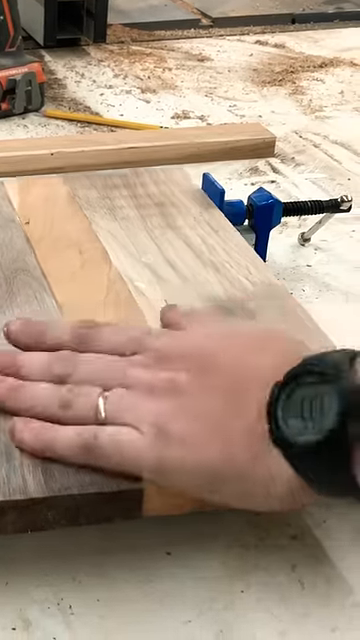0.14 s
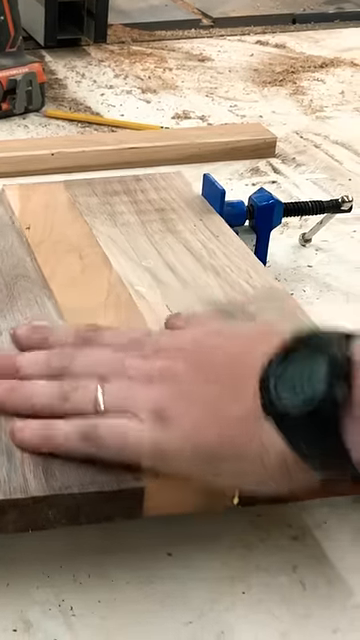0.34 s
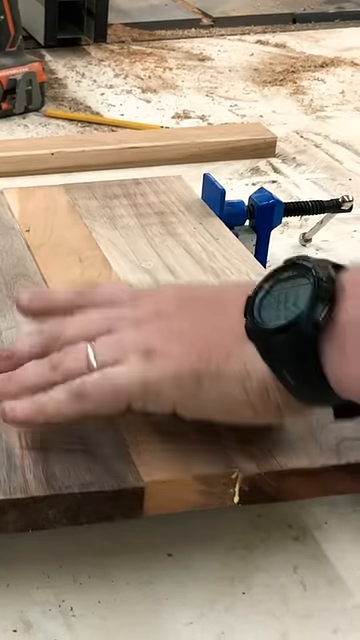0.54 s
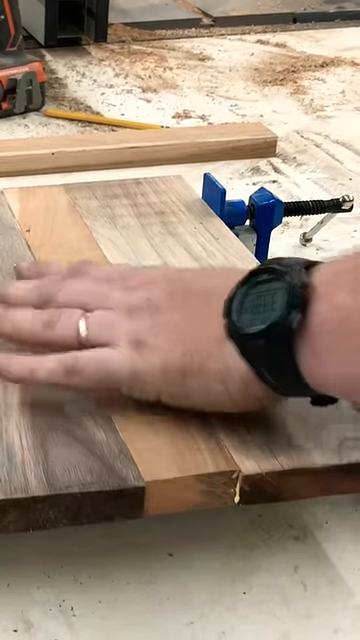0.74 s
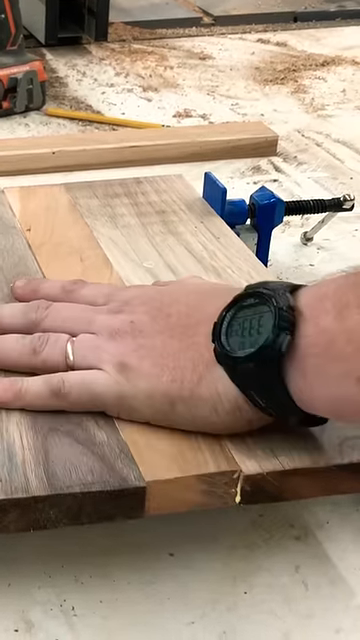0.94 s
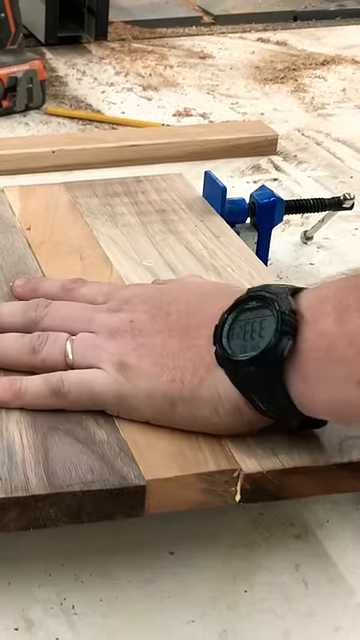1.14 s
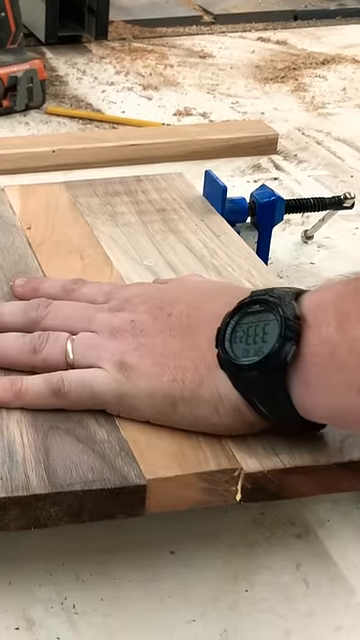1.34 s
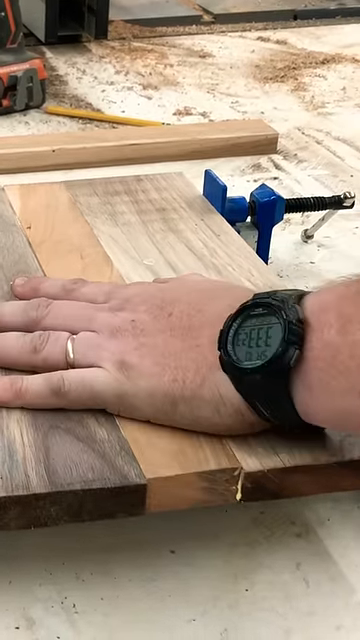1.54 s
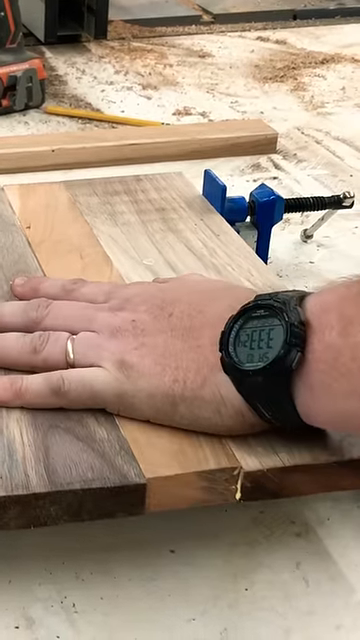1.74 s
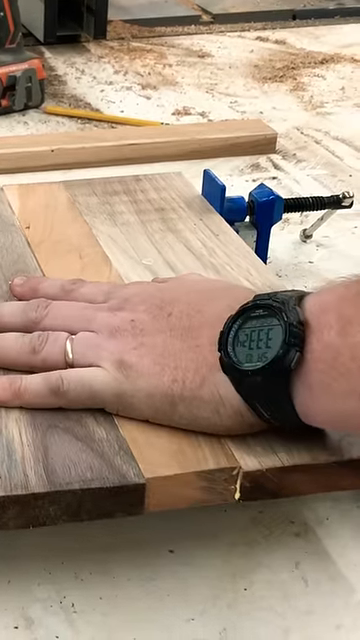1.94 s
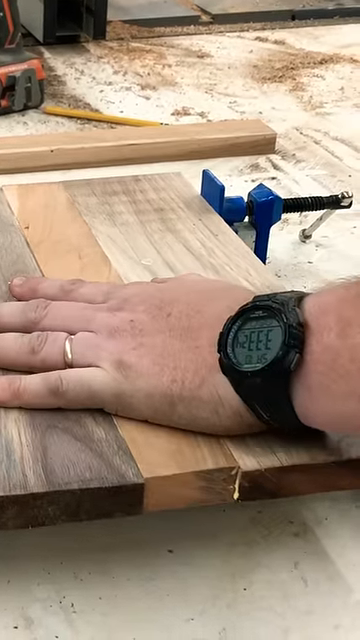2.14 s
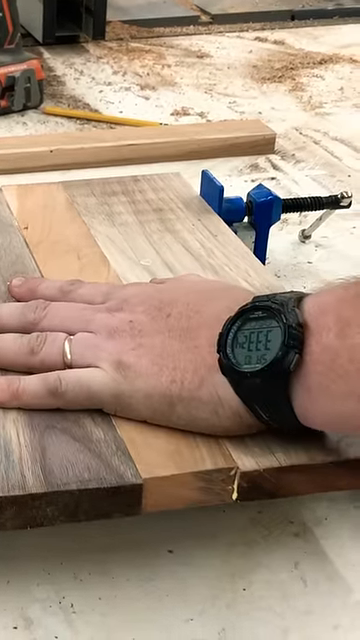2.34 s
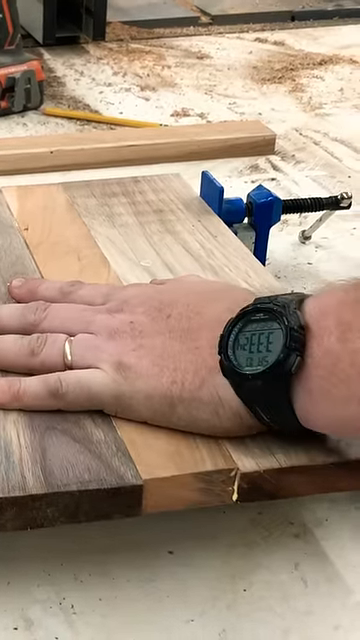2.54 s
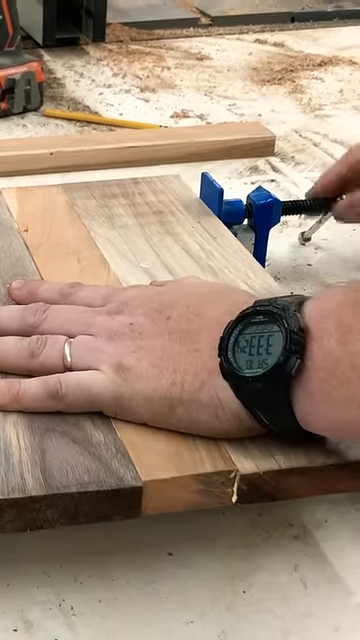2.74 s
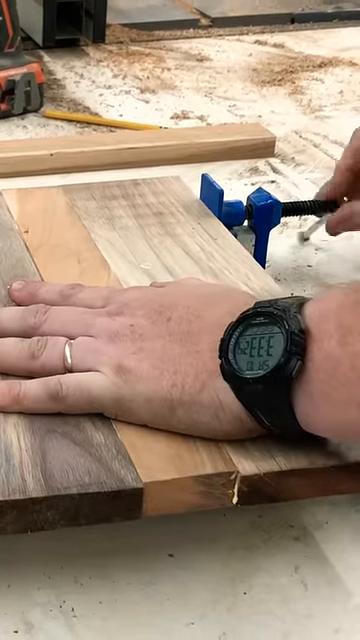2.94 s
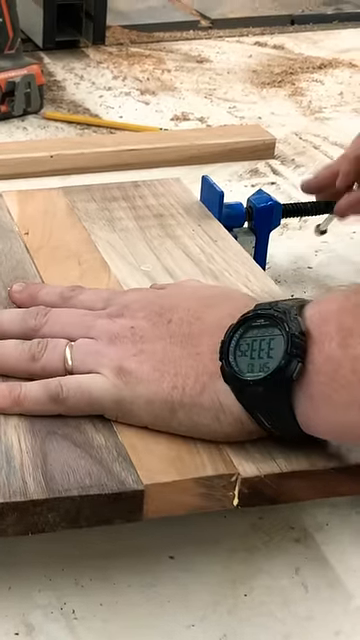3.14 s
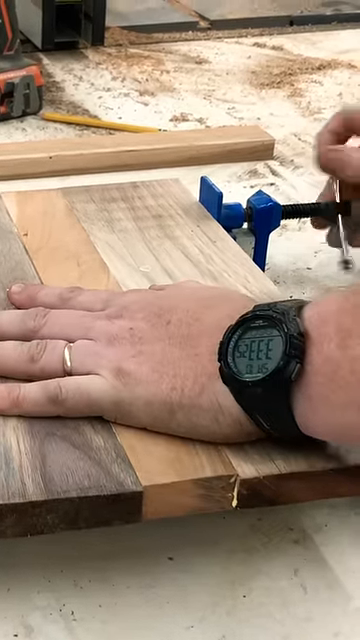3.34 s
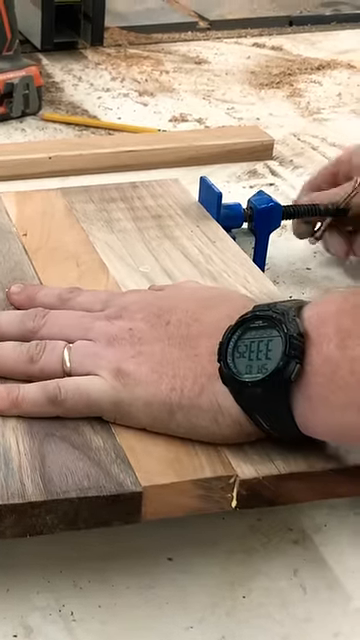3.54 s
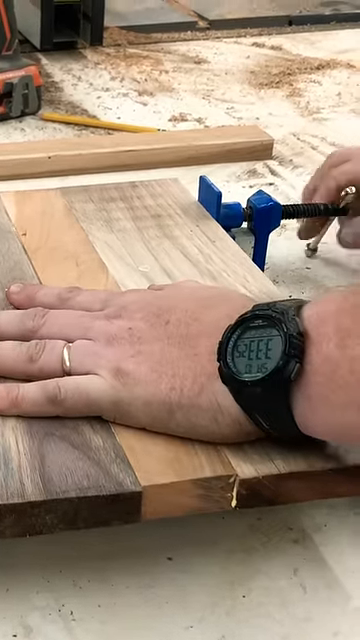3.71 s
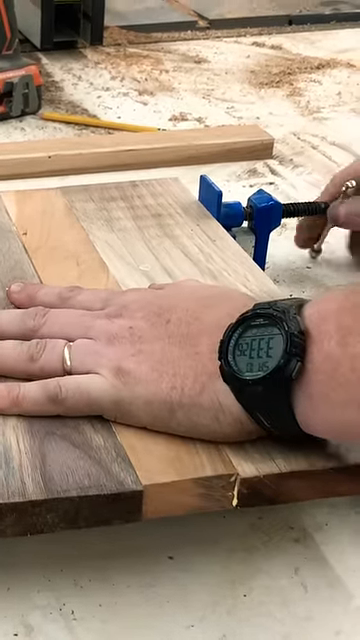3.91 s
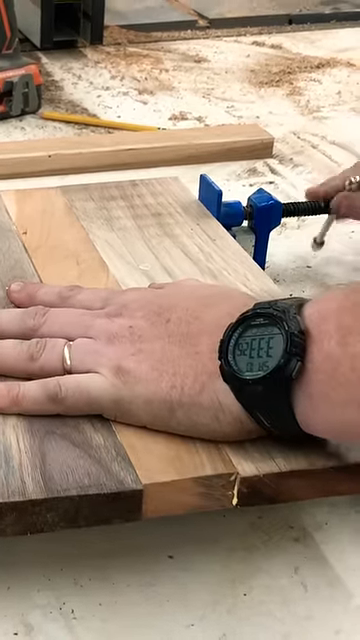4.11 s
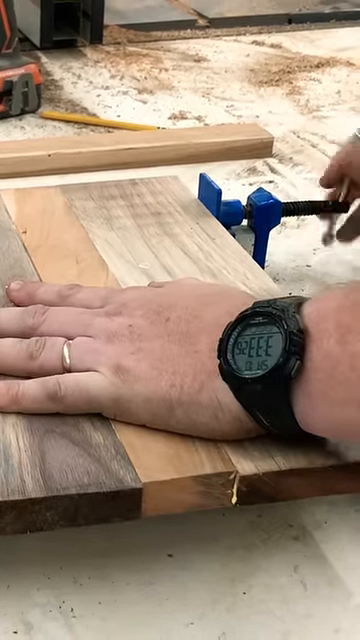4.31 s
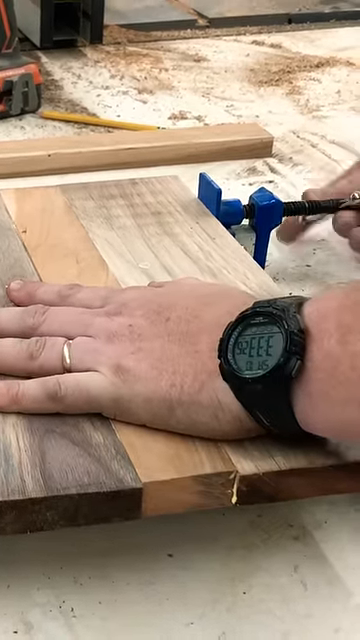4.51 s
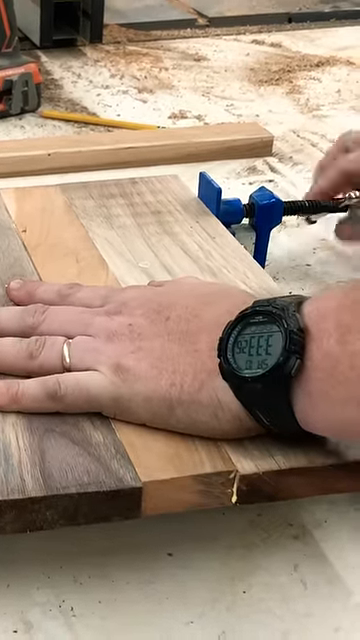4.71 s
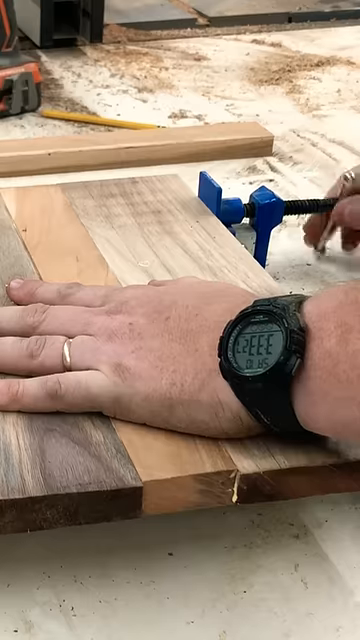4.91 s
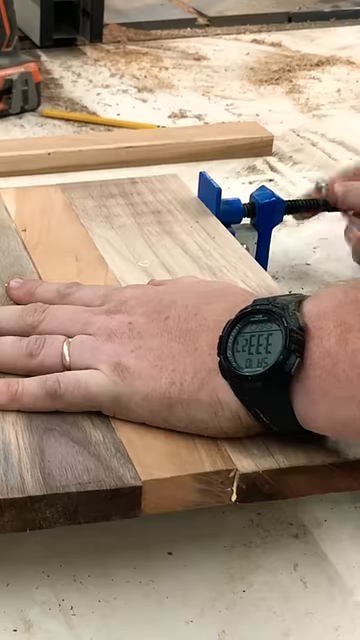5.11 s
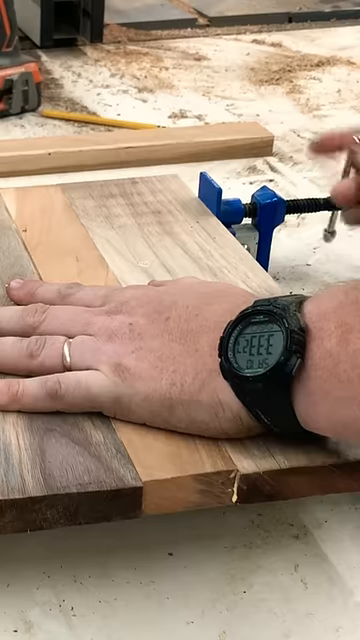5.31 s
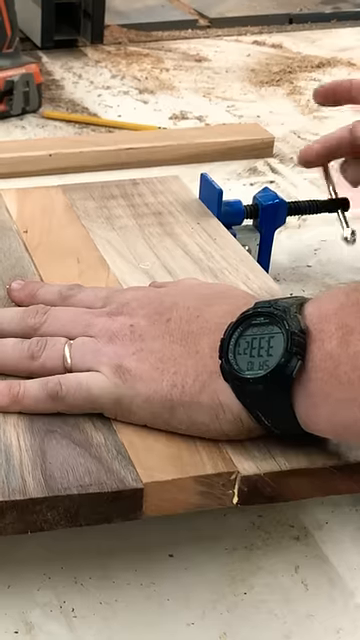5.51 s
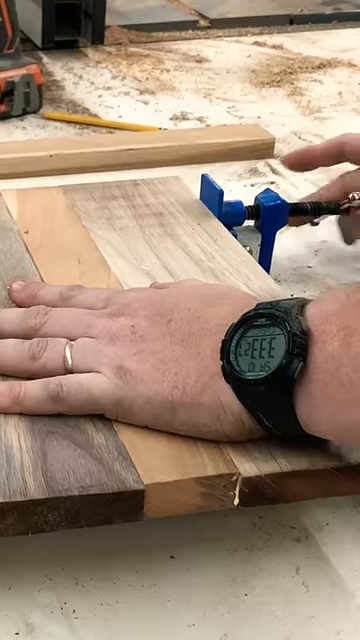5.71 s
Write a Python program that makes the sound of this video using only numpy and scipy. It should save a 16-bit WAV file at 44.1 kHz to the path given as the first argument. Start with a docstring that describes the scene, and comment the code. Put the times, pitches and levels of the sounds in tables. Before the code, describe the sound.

A small workshop with a quiet steady rumble, faint hiss and a short echo of about half a second. At 0.0 skin brushes softly over wood with a faint scrape; tiny clicks lead to a strong, hollow board knock at 0.27 with low ringing. A light metallic ring follows at 0.54 and a faint low board tone at 0.8. Then it is almost still until small scrapes at 1.75 and a knock at 1.84 that leaves a steel bar ringing, with faint ticks and a dull tap to 2.4. From 2.75 the clamp handle clacks, brightest at 2.95 with a short chirp. Faint gritty thread grinding rises and falls until about 4.7, among uneven clacks, scrapes and a chirp at 4.17. The loudest handle clack hits at 4.89, with a rough scrape and squeaky chirp by 4.95. Clacks at 5.08, 5.16 and 5.42 fade into room tone.

```python
"""In a small workshop, one hand presses glued boards flat on a bench and the other winds a steel bar clamp.
Boards knock on the bar and the handle clacks: each blow is a crack plus fading tones and coloured noise.
Scrapes and the grinding thread are streams of tiny slips; parts ring and the thread chirps as fading tones.
A wristwatch ticks and skin brushes the wood as shaped noise.
Noise echoes answer the contacts and the ringing parts, and a quiet rumble and hiss lies beneath."""
import sys
import numpy as np
from scipy import signal
from scipy.fft import rfft, irfft, next_fast_len
from scipy.io import wavfile
from scipy.ndimage import uniform_filter1d

SR = 44100
rng = np.random.default_rng(int(sys.argv[2]) if len(sys.argv) > 2 else 0)


def output_pcm(signal):
    """Save a mono or channel-first signal as 16-bit PCM at the path in sys.argv[1].

    Samples are clipped to [-1, 1] before scaling.
    """
    pcm = np.clip(np.atleast_2d(signal).T, -1, 1) * 32767
    wavfile.write(sys.argv[1], SR, np.round(pcm).astype(np.int16))


N = 254016  # length of the scene in samples

# In these tables levels are relative, and a fade time is the time to drop by 60 dB.
# The boards knock on the bar as the hand seats them.
# Each row: start in seconds, level in dB, weight in dB, hardness in dB, room level in dB.
BOARD_KNOCKS = [(0.237, -67, 19, 6, 4.5), (0.261, -53, -4, 4, 5), (0.268, -34, -2.5, -10, -6.5),
                (0.282, -66, 22.5, 18.5, 5), (0.425, -67.5, 18.5, -22, -1), (0.795, -81.5, 0, 14, 11.5),
                (1.733, -57, -6, -3, 2.5), (1.841, -46.5, 8.5, 10.5, -1.5), (2.402, -60, 6, -6, 0)]
# The sliding handle clacks in the screw.
# Each row: start in seconds, level in dB, weight in dB, hardness in dB, room level in dB.
HANDLE_CLACKS = [(2.751, -49, -6.5, 4.5, 1), (2.908, -48, -13, 12.5, 2.5), (2.918, -59.5, -1, 16, -8),
                 (2.948, -39.5, -10.5, 3, 2), (3.086, -63.5, 12, 4, -1), (3.22, -60.5, 4.5, 6, 2),
                 (3.417, -66.5, 26, -3, -1.5), (3.531, -50, -4, -8, 0), (3.624, -58, 12, 3, -1),
                 (3.728, -58, 1, -12, -8), (4.06, -51.5, -1.5, -8, 4.5), (4.139, -53, -1, -7, 4),
                 (4.4, -63.5, -2, 6.5, -4), (4.464, -66, 13.5, 3, -1.5), (4.801, -59, 3, 4.5, 1.5),
                 (4.888, -33.5, -7, -3.5, -0.5), (5.078, -41, -2.5, 0, -5), (5.083, -47.5, 4, 2, 4),
                 (5.158, -55, 12.5, 0, -2), (5.422, -46.5, -3.5, 3, -1)]
# Boards or thread stick, then slip.
# Each row: start in seconds, length in seconds, level in dB, weight in dB, hardness in dB.
SCRAPES = [(0.011, 0.064, -65, 7, 10.5), (0.532, 0.058, -68, 1, 8.5), (1.748, 0.034, -65, 10, -2),
           (1.791, 0.031, -59, -11, 4.5), (1.816, 0.025, -52, -5, -7), (2.164, 0.047, -74.5, 1, 10),
           (2.37, 0.022, -68.5, 5, -13), (2.84, 0.014, -51.5, -3, -4.5), (2.972, 0.03, -65, -4.5, 4.5),
           (3.024, 0.037, -61.5, 9.5, -1), (3.115, 0.035, -61.5, 2.5, -0.5), (3.265, 0.059, -75, 21, -11),
           (3.538, 0.011, -54.5, 7, -3.5), (3.598, 0.033, -54.5, -2, -10), (3.765, 0.013, -61.5, 6, -9),
           (4.072, 0.016, -61, 9.5, -2), (4.158, 0.023, -56.5, 3.5, -4), (4.182, 0.023, -51, 2.5, -0.5),
           (4.33, 0.12, -72, 12, 0), (4.541, 0.02, -60.5, 6.5, -10), (4.819, 0.032, -81, 27.5, -7),
           (4.909, 0.022, -49, -10, -2), (4.927, 0.027, -39.5, -7.5, -8), (5.188, 0.032, -68.5, 14.5, -9)]
# How hard the screw grinds while it is wound, easing at each change of grip.
# Each row: time in seconds, level in dB.
WINDING = [(2.96, -63), (3.13, -65), (3.2, -85), (3.28, -69), (3.37, -63.5), (3.48, -73), (3.67, -64),
           (3.73, -84), (3.84, -68), (4.0, -82), (4.28, -69.5), (4.36, -74), (4.5, -72), (4.63, -87),
           (4.72, -96)]
# Touches that leave a part free to ring. Each row: start in seconds, level in dB, name of the part.
RINGS = [(0.271, -39.5, "boards"), (0.541, -47.5, "jaw"), (0.797, -55.5, "boards"), (1.843, -34.5, "bar"),
         (2.909, -43.5, "handle"), (2.949, -43.5, "handle"), (4.058, -47, "bar")]
# The tones of each such part, listed by its name. Each row: pitch in Hz, level in dB, fade time in seconds.
PART_MODES = {"boards": [(97.6, -9.5, 0.73), (152, 0, 0.48), (205, 2, 0.14), (242, 1.5, 0.1)],
              "jaw": [(712, -1.5, 0.39), (937, -5, 0.31), (2590, -20, 0.68)], "bar": [(380, -2, 0.25),
              (513, -5.5, 0.13), (1360, -2.5, 0.2), (2364, -17.5, 0.11)], "handle": [(1990, 0, 0.12),
              (2210, -7, 0.12), (2620, -9, 0.064), (6520, -4.5, 0.044), (9900, -12.5, 0.055)]}
# The dry thread chirps as it breaks loose. Each row: start in seconds, pitch in Hz, level in dB.
CHIRPS = [(2.834, 1085, -39.5), (2.949, 1090, -36), (4.169, 1150, -42), (4.947, 1058, -25)]
# Tiny clicks of the wristwatch. Each row: start in seconds, level in dB.
TICKS = [(0.182, -52), (0.2854, -53), (1.986, -61), (2.127, -62), (2.529, -60), (3.664, -58.5)]
# Skin brushing over wood and handle. Each row: start in seconds, length in seconds, level in dB.
BRUSHES = [(0.016, 0.17, -63), (0.325, 0.24, -67), (0.584, 0.11, -65), (0.894, 0.14, -70.5),
           (3.546, 0.098, -63.5), (4.468, 0.063, -70), (4.555, 0.055, -69), (4.925, 0.066, -68),
           (5.188, .08, -70)]

# Tones of boards, clamp and bench together. Each row: pitch in Hz, level in dB, fade time in seconds.
BODY_MODES = [(97, -24, 0.26), (156.7, -11, 0.39), (188, -9.5, 0.043), (224, -11.5, 0.059),
              (305.7, -11, 0.15), (366.5, -12, 0.096), (431, -19, 0.057), (545, -0.5, 0.074),
              (657, -11, 0.12), (850, -14, 0.14), (905, -4, 0.042), (1025, 4, 0.025), (1095, -7.5, 0.072),
              (1330, -11.5, 0.12), (1620, -0.5, 0.035), (1711, 0.5, 0.036), (1841, -2, 0.037),
              (2403, -17.5, 0.036), (2605, -10.5, 0.029), (5130, -46, 0.045), (6350, -33, 0.058)]
# The dense, quickly damped rest of the body. Each row: frequency in Hz, level in dB.
WOOD_SPECTRUM = [(60, -24), (115, -25), (170, 10), (600, 9), (760, 1), (1050, 4), (1800, 0.5), (2200, -10),
                 (3000, -13.5), (6000, -22.5), (7500, -27), (10000, -21), (15000, -60.5)]
# Colour of the skin's hiss. Each row: frequency in Hz, level in dB.
SKIN_SPECTRUM = [(1000, 7), (2500, 0), (4700, 0), (6300, -7), (8700, 1), (11000, -3.5), (15000, -2.5)]
# Colour of the watch clicks. Each row: frequency in Hz, level in dB.
WATCH_SPECTRUM = [(1000, -19), (4000, -7), (7000, 6), (9000, 6), (11000, -24), (15000, 5)]

# Edges in Hz of the six bands: thud, knock, clack, clank, crack and tick.
BAND_EDGES = [72, 350, 750, 1400, 2300, 6500, 15800]
# Colour of each kind of contact: one level in dB for each of the six bands.
BOARD_COLOUR = [-2.5, 0.5, -0.5, -2.5, -11, -33]
HANDLE_COLOUR = [-4, 0, -1, -2.5, -9.5, -35]
SCRAPE_COLOUR = [-2.5, -3.5, 0.5, -1.5, -10, -27]
# Weight mostly fills the low bands. One value for each band: dB gained per dB of weight.
WEIGHT_LAW = [0.99, 0.72, 0, 0.0065, 0.16, 0]
# Hardness mostly fills the high bands. One value for each band: dB gained per dB of hardness.
HARDNESS_LAW = [-0.046, 0.14, -0.081, 0.49, 0.97, 1.86]

# How long the workshop echoes. Each row: frequency in Hz, fade time in seconds.
ROOM_T60 = [(100, 1), (300, 0.61), (1000, .45), (3000, 0.55), (10000, 0.37)]
# Colour of the echo. Each row: frequency in Hz, level in dB.
ROOM_SPECTRUM = [(50, -2), (95, -1.5), (118, -3), (152, 9), (200, -4.5), (400, 0.5), (1000, -2), (2000, -6),
                 (5000, -3), (12000, -10)]
# Colour of the workshop's rumble and hiss. Each row: frequency in Hz, level in dB per Hz.
AIR_SPECTRUM = [(15, -44), (25, -22), (42, -6), (80, -5), (120, -4.5), (380, -7.5), (570, -13),
                (1000, -16.5), (1500, -19.5), (2100, -22.5), (3200, -24.5), (5000, -26.5), (15800, -33.5)]

GRIND_WEIGHT_DB, GRIND_HARDNESS_DB = 6, -1
CHIRP_T60 = 0.041  # fade time in seconds
LOW_CUT_HZ, TOP_HZ = 25, 15950  # frequency limits of microphone and recorder
BAND_FILTERS = [signal.butter(4, pair, 'band', fs=SR, output='sos')
                for pair in zip(BAND_EDGES, BAND_EDGES[1:])]


def amp(db):
    """Turn decibels into a gain."""
    return 10 ** (np.asarray(db) / 20)


def unit(x):
    """Scale a signal to an average strength (rms) of 1."""
    return x / np.sqrt(np.mean(x ** 2) + 1e-20)


def along(points, hz):
    """Read a curve between its points, with pitch on a log scale."""
    point_hz, values = np.transpose(points)
    return np.interp(np.log(hz + 1), np.log(point_hz), values)


def noise(spectrum, size):
    """Make noise of rms 1 by weighting the frequencies of white noise."""
    hz = np.fft.rfftfreq(size, 1 / SR)
    white = rfft(rng.standard_normal(size))
    return unit(irfft(white * amp(along(spectrum, hz)), size))


def add(track, start_s, sound):
    """Mix a sound into the track at a time."""
    start = max(0, round(start_s * SR))
    part = sound[:max(0, N - start)]
    track[start:start + len(part)] += part


def knocks(table, colour, count=3):
    """Single blows of wood or steel: each sets the whole body ringing."""
    out = np.zeros(N)
    for start_s, db, weight_db, hardness_db, room_db in table:
        levels_db = contact(colour, db, weight_db, hardness_db)
        sides = []
        for side in range(count):
            blow = body(dense_db=13.5, dense_t60=0.031, scatter_db=5.5, crack_db=-4)
            sides.append(voiced(blow, levels_db, length=0.013))
        add(out, start_s, radiate(sides, room_db))
    return amp(-1.0) * out


def contact(colour, db, weight_db, hardness_db):
    """Band levels of a contact: weight mostly adds bass, hardness mostly adds treble."""
    return db + np.array(colour) + weight_db * np.array(WEIGHT_LAW) + hardness_db * np.array(HARDNESS_LAW)


def body(dense_db, dense_t60, scatter_db, crack_db, crack_t60=0.0075, build_up=0.0013):
    """One contact: a sharp crack, then tones of varied strength over crowded, quickly fading ones."""
    t = np.arange(SR // 10) / SR
    tones = np.zeros(len(t))
    for hz, db, t60 in BODY_MODES:
        strength = amp(db + scatter_db * rng.normal() - 60 * t / t60)
        tones += strength * np.sin(2 * np.pi * (hz * t + rng.random()))
    dense = amp(dense_db - 60 * t / dense_t60) * noise(WOOD_SPECTRUM, len(t))
    crack = amp(crack_db - 60 * t / crack_t60) * rng.standard_normal(len(t))
    fade_in = 1 - np.exp(-t / build_up)
    fade_out = 1 - (t / t[-1]) ** 2
    return crack + (tones + dense) * fade_in * fade_out


def voiced(sound, levels_db, length):
    """A contact's colour, weight and hardness set how strong each band is over its length in seconds."""
    out = np.zeros(len(sound))
    for band_filter, db in zip(BAND_FILTERS, levels_db):
        band = signal.sosfilt(band_filter, sound)
        strength = np.sqrt(np.mean(band[:round(length * SR)] ** 2))
        out += amp(db) * band / strength
    return out


def scrapes(slip_rate=560, slip_spread_db=3, swell_db=3, count=2):
    """Runs of fine, uneven slips, about slip_rate a second, that swell and ease again."""
    out = np.zeros(N)
    for start_s, length, db, weight_db, hardness_db in SCRAPES:
        gaps, sizes = rng.exponential(size=256), rng.normal(size=256)
        times = (np.cumsum(gaps) - gaps[0]) / slip_rate  # the first slip comes at once
        during = times < length
        slip_db = slip_spread_db * sizes + swell_db * np.sin(np.pi * times / length)
        slips = np.bincount((times[during] * SR).astype(int), amp(slip_db[during]))
        levels_db = contact(SCRAPE_COLOUR, db, weight_db, hardness_db)
        sides = [creak(slips, levels_db, length) for side in range(count)]
        add(out, start_s, radiate(sides, room_db=0.0))
    return amp(-1.5) * out


def creak(slips, levels_db, length):
    """Each slip jolts the body, so a copy of one jolt starts at every slip."""
    jolt = body(dense_db=18, dense_t60=0.016, scatter_db=1.5, crack_db=6)
    return voiced(signal.fftconvolve(slips, jolt), levels_db, length)


def grind(slip_rate=480, slip_spread_db=4.5, count=2):
    """The turning thread slips faintly at random, about slip_rate a second, as strongly as it is wound."""
    out = np.zeros(N)
    times, effort_db = np.transpose(WINDING)
    t = np.arange(times[0], times[-1], 1 / SR)
    happens = rng.random(N) < slip_rate / SR
    slips = happens * amp(slip_spread_db * np.clip(rng.normal(size=N), -2, 2))
    levels_db = contact(SCRAPE_COLOUR, 0, GRIND_WEIGHT_DB, GRIND_HARDNESS_DB)
    effort = amp(np.interp(t, times, effort_db))
    sides = [effort * creak(slips[:len(t)], levels_db, len(t) / SR)[:len(t)] for side in range(count)]
    add(out, times[0], radiate(sides, room_db=-2.0))
    return amp(-2.5) * out


def rings():
    """Boards and steel parts left ringing, and the short chirps of the thread."""
    out = np.zeros(N)
    for start_s, db, part in RINGS:
        add(out, start_s, amp(db) * ring(PART_MODES[part]))
    for start_s, hz, db in CHIRPS:
        add(out, start_s, ring([(hz, db, CHIRP_T60)]))
    return out


def ring(modes, waver=0.18):
    """Free tones ring on, their phase wavering (radians rms) as the part shifts in its seat."""
    t = np.arange(SR // 2) / SR
    tone = np.zeros(len(t))
    for hz, db, t60 in modes:
        drift = waver * noise([(30, 0), (150, -2), (600, -83)], len(t))
        tone += amp(db - 60 * t / t60) * np.sin(2 * np.pi * hz * t + drift)
    tone *= 1 - np.exp(-t / 0.00074)  # soft start
    return radiate([tone, tone], room_db=-11.5)


def watch_ticks(tick_t60=0.024):
    """Dry clicks of the wristwatch: coloured noise that starts at once and fades fast."""
    out = np.zeros(N)
    t = np.arange(SR // 20) / SR
    for start_s, db in TICKS:
        add(out, start_s, amp(db - 60 * t / tick_t60) * noise(WATCH_SPECTRUM, len(t)))
    return out


def skin_brushes(grain_db=2, colour_db=8.0):
    """Soft swells of grainy hiss, each of its own colour, as skin slides."""
    out = np.zeros(N)
    t = np.arange(SR // 3) / SR
    for start_s, length, db in BRUSHES:
        colour = [(hz, level + colour_db * rng.normal()) for hz, level in SKIN_SPECTRUM]
        grain = unit(uniform_filter1d(rng.standard_normal(len(t)), size=100))
        hiss = unit(amp(grain_db * grain) * noise(colour, len(t)))
        swell = np.exp(-(3 * (t - length / 2) / length) ** 2)
        speed = swell * (1 - np.exp(-t / 0.0022))  # soft start
        add(out, start_s, amp(db) * speed * hiss)
    return out


def radiate(sides, room_db):
    """Each side of a body sends out its own wave: the first meets the microphone, the others the walls."""
    room = amp(room_db) * sum(echo(side) for side in sides[1:]) / np.sqrt(len(sides) - 1)
    direct = np.pad(sides[0], (0, len(room) - len(sides[0])))
    return room + direct


def echo(sound, count=86, size=512):
    """The workshop's answer: overlapping frames of noise, each frequency fading at its own pace."""
    hop = size // 2
    hz = np.fft.rfftfreq(size, 1 / SR)
    t = np.arange(count)[:, None] * hop / SR
    decay = np.exp(-np.log(1000) * t / along(ROOM_T60, hz))
    decay *= amp(along(ROOM_SPECTRUM, hz)) / np.sqrt(hop * np.sum(decay ** 2, axis=0))
    window = np.sin(np.pi * np.arange(size) / size)
    frames = irfft(rfft(rng.standard_normal((count, size))) * decay) * window
    tail = (frames[:-1, hop:] + frames[1:, :hop]).ravel()
    tail *= 1 - np.exp(-(np.arange(len(tail)) / SR / 0.0053) ** 2)  # the walls take a moment to answer
    return signal.fftconvolve(sound, tail)


def air(level_db=-68):
    """The workshop's quiet rumble and hiss: steady coloured noise."""
    return amp(level_db) * noise(AIR_SPECTRUM, N)


def scene():
    """Everything added together at one microphone."""
    blows = knocks(BOARD_KNOCKS, BOARD_COLOUR) + knocks(HANDLE_CLACKS, HANDLE_COLOUR)
    thread_and_parts = scrapes() + grind() + rings()
    hands = watch_ticks() + skin_brushes()
    return (blows + thread_and_parts + hands + air())[None]


def record(dry):
    """The microphone sheds the deepest rumble, and the recorder keeps nothing above its band limit."""
    low_cut = signal.butter(3, LOW_CUT_HZ, 'high', fs=SR, output='sos')
    heard = signal.sosfilt(low_cut, dry)
    size = next_fast_len(N + SR // 2)
    kept = np.fft.rfftfreq(size, 1 / SR) < TOP_HZ
    return irfft(rfft(heard, size) * kept, size)[..., :N]


dry = scene()
out = record(dry)
output_pcm(out)
```